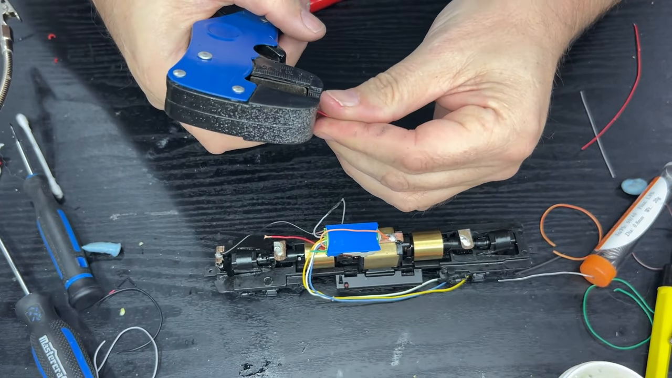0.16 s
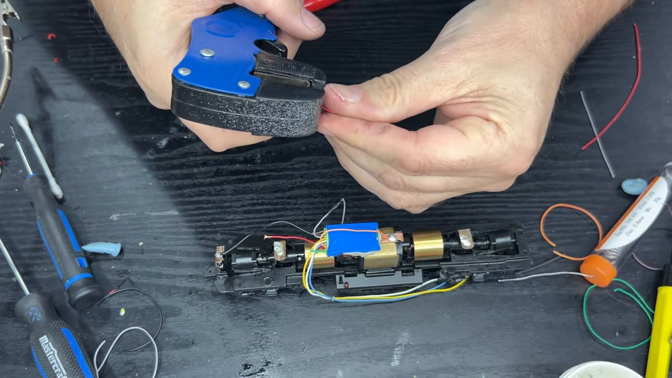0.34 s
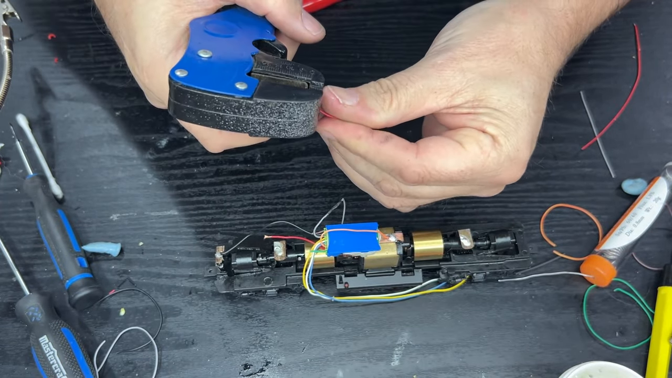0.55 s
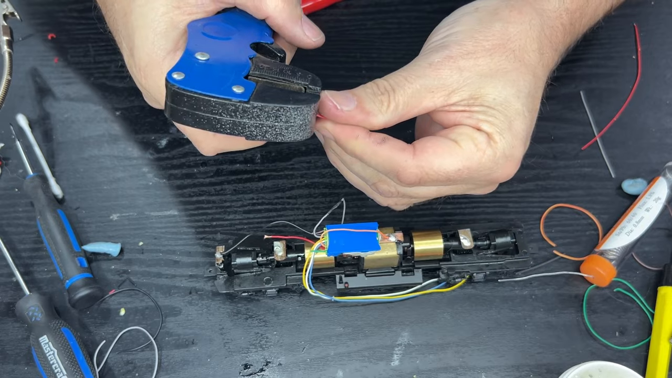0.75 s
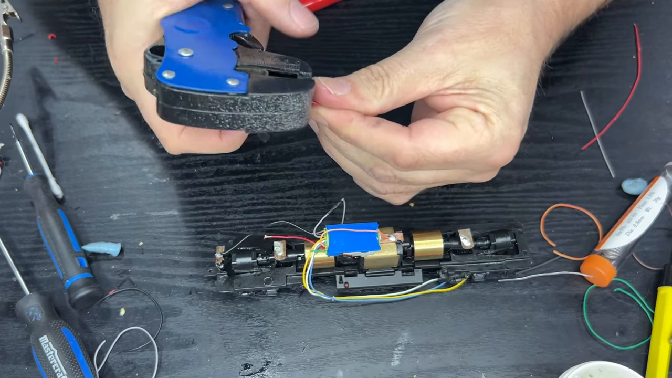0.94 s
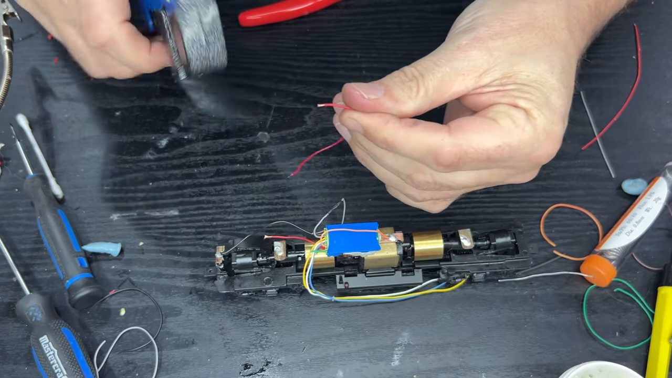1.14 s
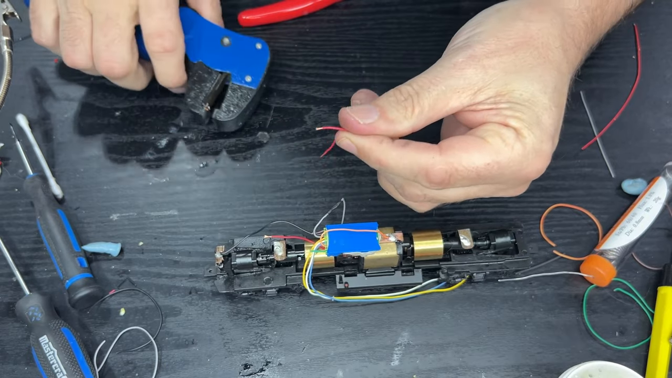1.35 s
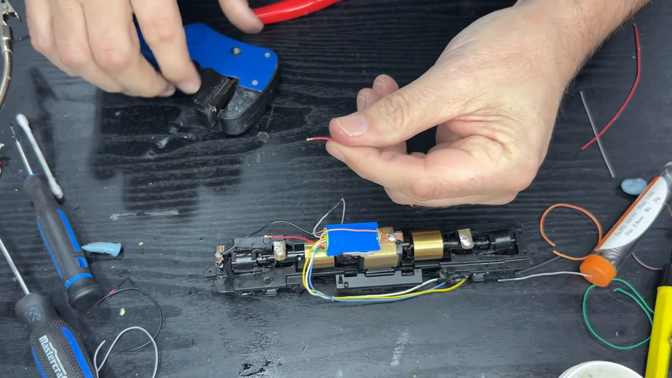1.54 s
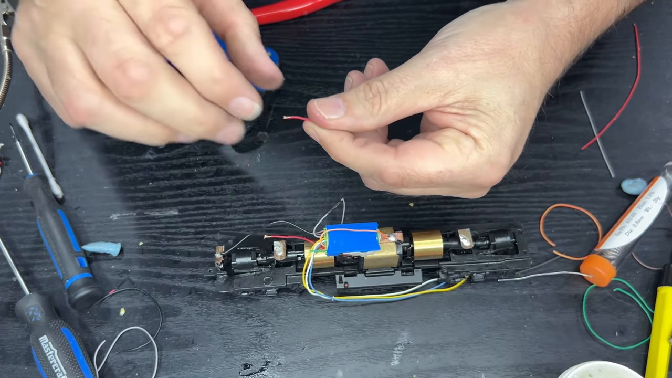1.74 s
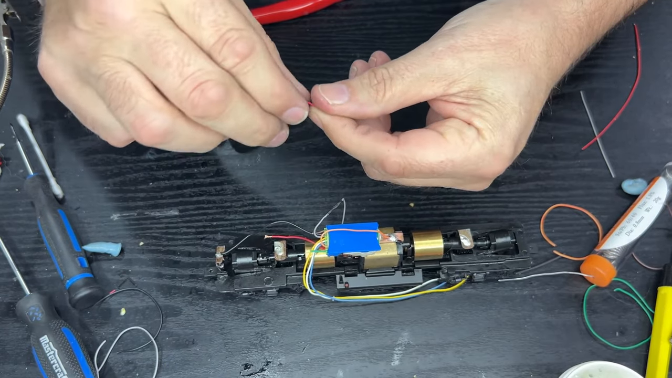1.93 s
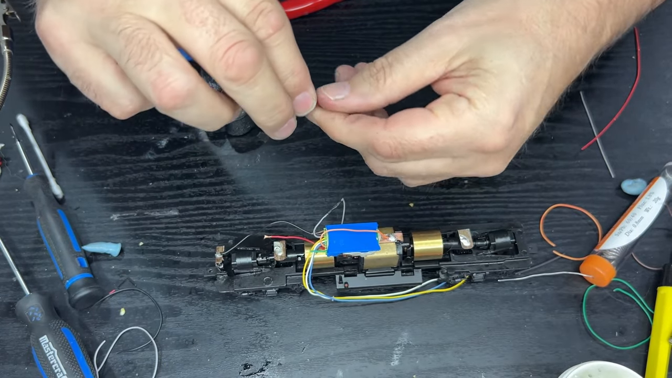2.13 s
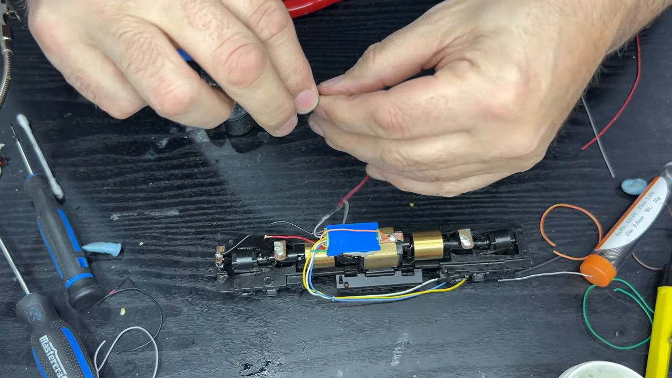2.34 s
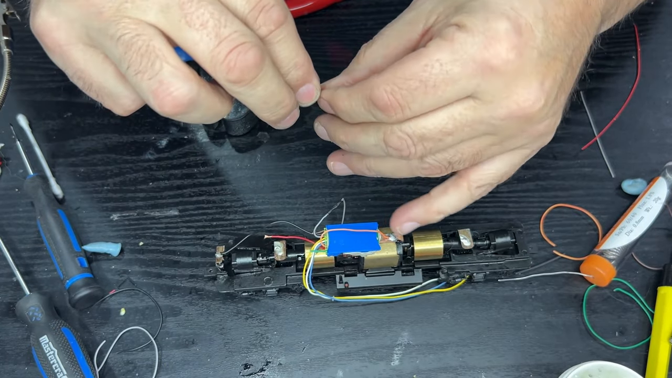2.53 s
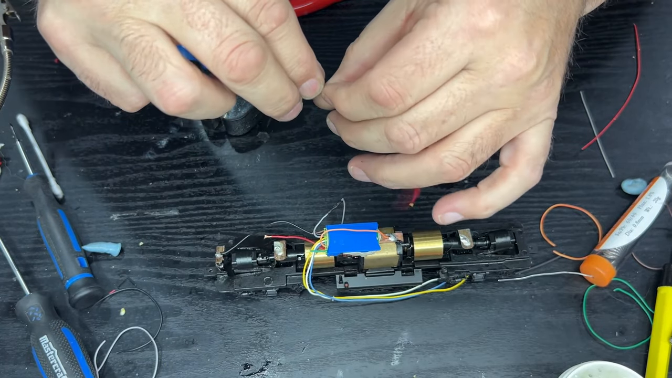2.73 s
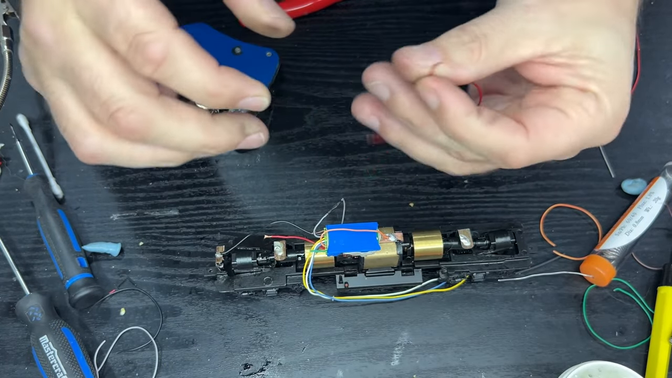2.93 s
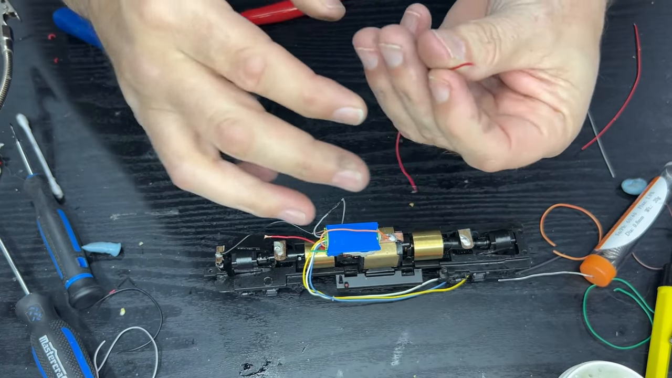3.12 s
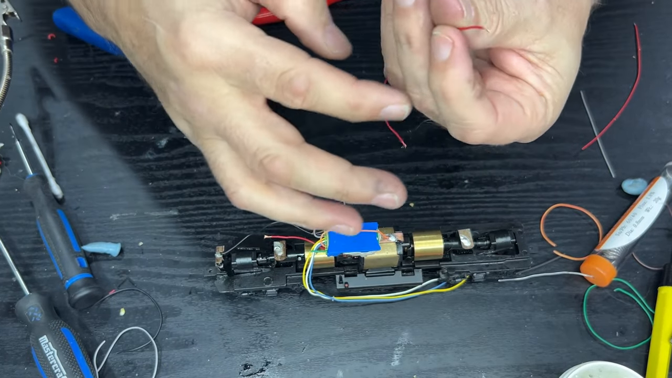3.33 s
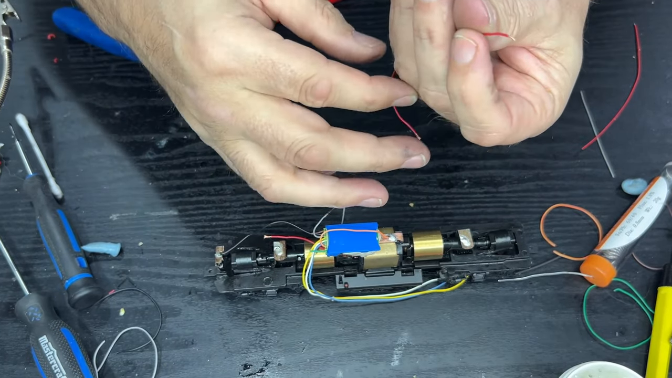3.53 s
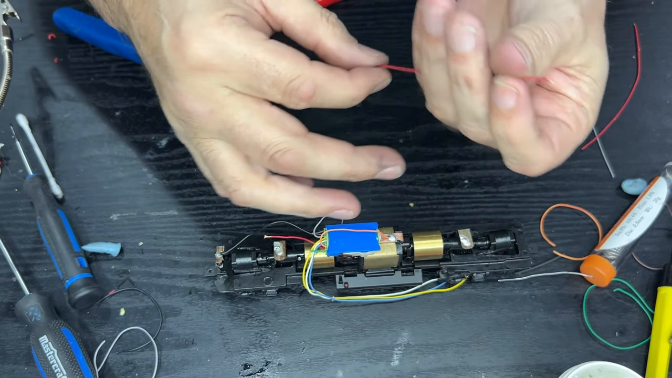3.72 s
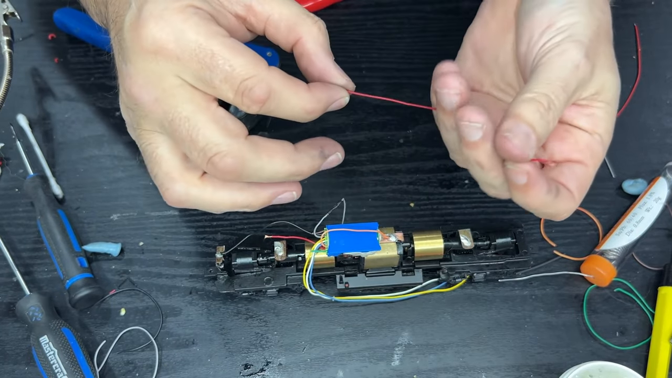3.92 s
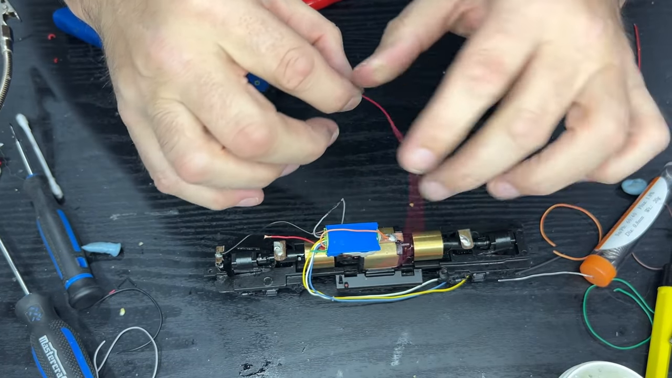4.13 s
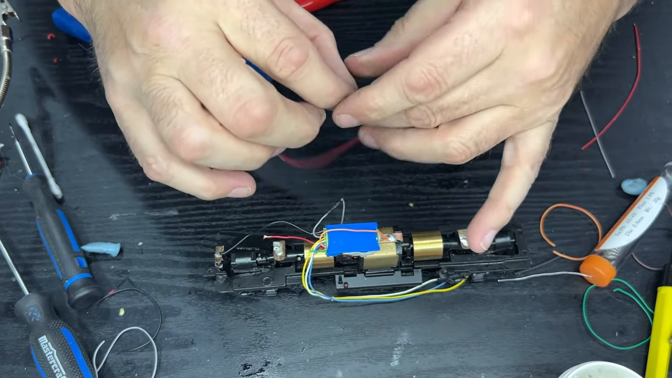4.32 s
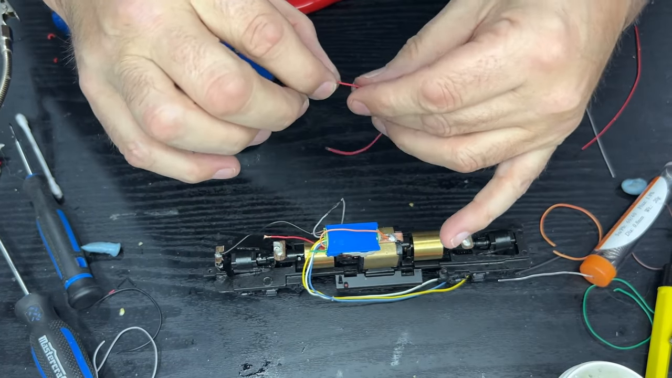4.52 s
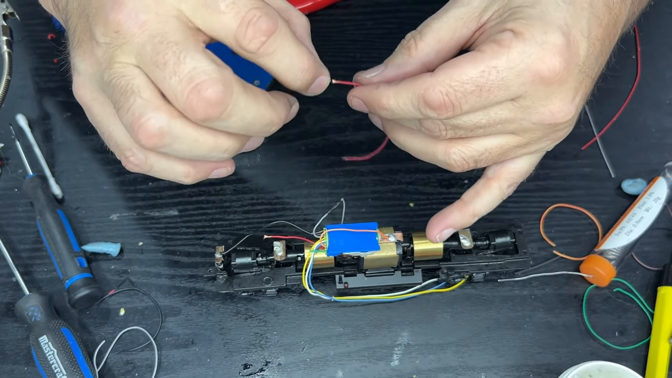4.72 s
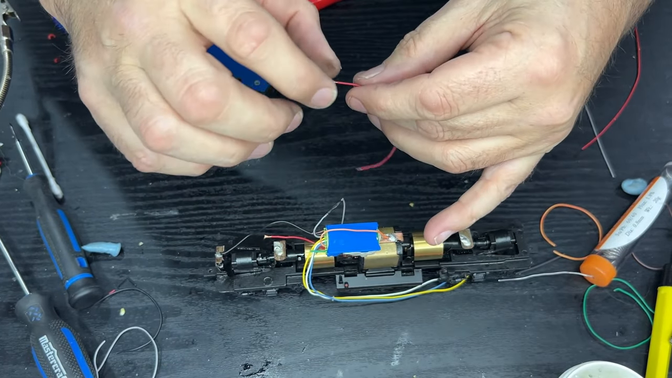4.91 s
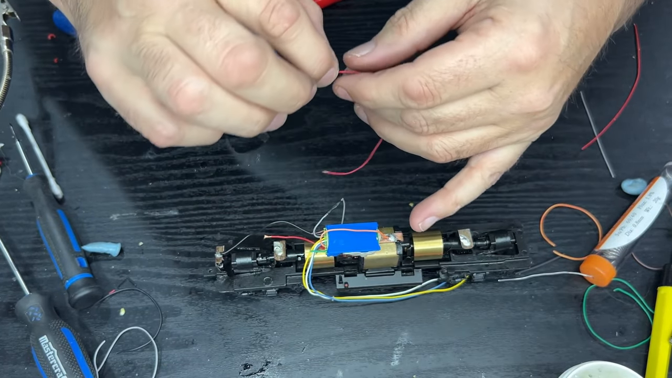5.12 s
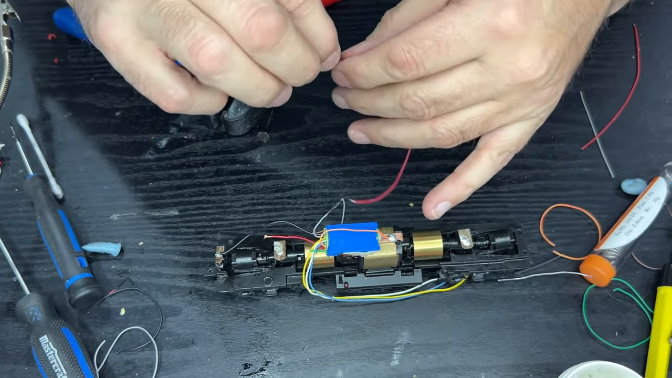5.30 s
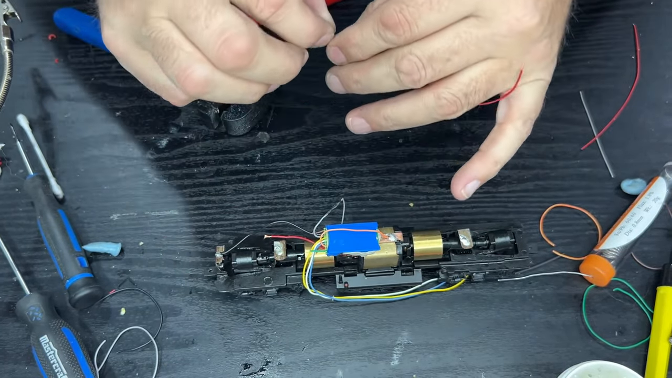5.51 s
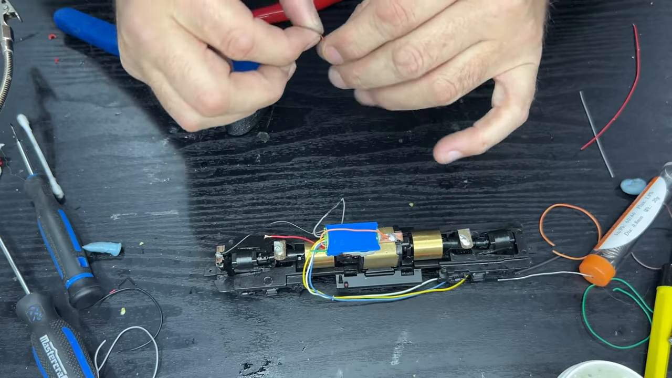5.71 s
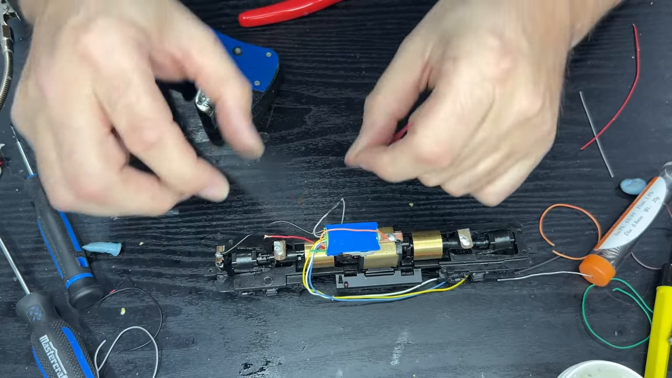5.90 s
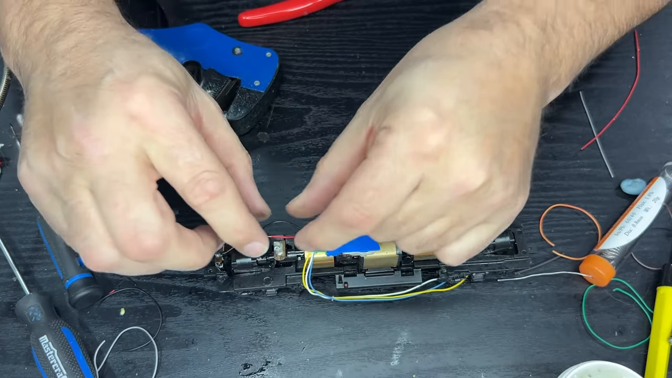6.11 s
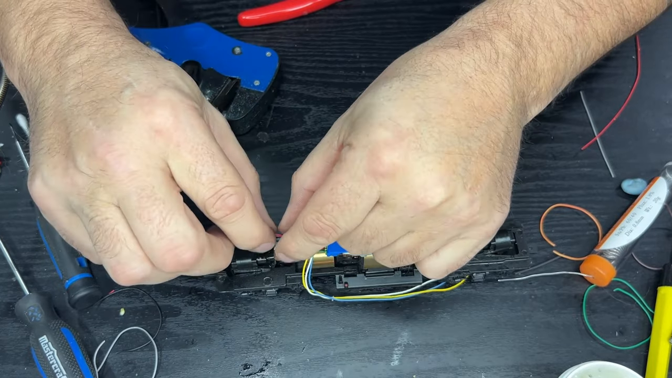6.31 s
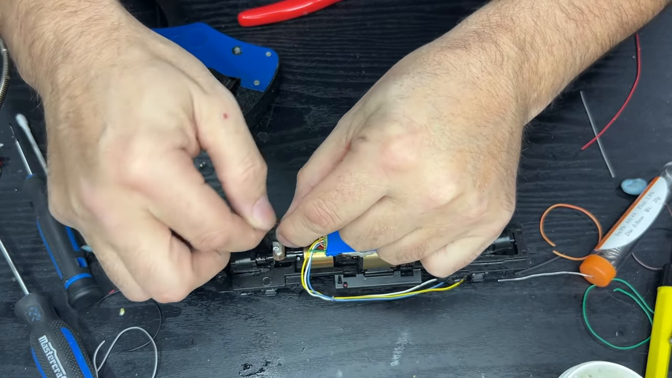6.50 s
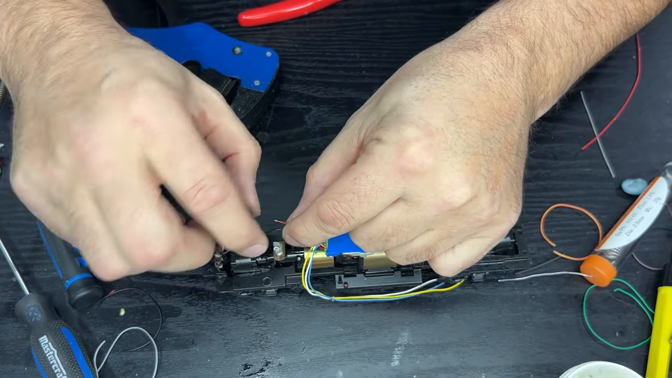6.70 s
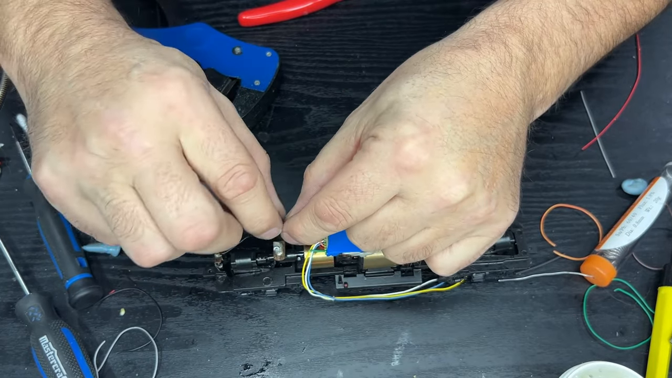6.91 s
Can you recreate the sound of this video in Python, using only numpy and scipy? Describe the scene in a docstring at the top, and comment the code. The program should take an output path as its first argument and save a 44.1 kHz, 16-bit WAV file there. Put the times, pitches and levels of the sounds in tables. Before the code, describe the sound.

A hand wire stripper is squeezed with a quick ratchety snap, then clacks and thuds onto a wooden bench before faint fingertip handling of thin wire.

```python
"""Skin slides and the room's rumble swells, then a wire stripper is squeezed and its steel jaws snap and ring.
The tool lands nose first, then with its whole body, and rocks to rest: its shell clacks, the top thuds.
Fingers then twist the wire in bright ticks, between soft grainy rubs of hands and low swells.
Blows are decaying noise bursts, resonances damped sines, rubs modulated noise; a small room answers,
over a low rumble and a very faint hiss."""
import sys
import numpy as np
from scipy import signal
from scipy.fft import rfft, irfft, next_fast_len
from scipy.io import wavfile
from scipy.ndimage import uniform_filter1d, map_coordinates

SR = 44100
rng = np.random.default_rng(int(sys.argv[2]) if len(sys.argv) > 2 else 0)


def log_audio(samples):
    """Write samples as a 16-bit WAV file to the path given in sys.argv[1]."""
    # one column per channel
    frames = np.atleast_2d(samples).T
    # limit to full scale, then quantise
    limited = np.clip(frames, -1, 1)
    pcm = np.round(limited * 32767).astype(np.int16)
    wavfile.write(sys.argv[1], SR, pcm)


N = 306495

# Event levels stand before the gains in scene(); treble tilts act above 1500 Hz.
# snaps of the mechanism: start_s, level_db, slip_decay_s, tilt_db_per_octave
JAW_SNAPS = [(.6745, -44.5, 0.00093, -12), (.827, -23.5, 0.0024, 4.5), (.847, -25, 0.0033, -0.5),
             (.863, -23, 0.0032, 1), (.879, -30.5, 0.0044, -4.5), (0.965, -13, .007, 0),
             (1.0503, -10, 0.0018, 2.5)]
# spectrum of a snap: frequency_hz, level_db
JAW_SPECTRUM = [(150, -31), (400, -23), (650, -15), (1200, -13.5), (1500, -11.5), (2000, -1.5), (2800, 0),
                (3700, -8), (5200, -18), (6400, -8.5), (7700, -8), (10000, -18), (16000, -18.5)]
# resonances of the steel jaws: frequency_hz, level_db, t60_s
STEEL_MODES = [(1922, -6, .05), (2313, -4, .05), (2662, 4, .07), (2790, 1, .06), (3306, -5, .06),
               (3865, -12, .06), (6438, -10, .05), (7600, -7, .04)]
# the tool landing and rocking: start_s, shell_clack_db, weight_thud_db, tilt_db_per_octave
TOOL_LANDINGS = [(1.3921, -21, -23.5, -6), (1.4873, -7.5, -12.5, .5), (1.5004, -17, -10, -3),
                 (1.517, -23.5, -26, 0.5), (1.536, -21, -14, -2), (1.56, -26.5, -16.5, -2),
                 (1.586, -31.5, -23, -3)]
# spectrum of the plastic shell: frequency_hz, level_db
SHELL_SPECTRUM = [(100, -23), (400, -7), (800, -4), (1200, 1), (2200, 1.5), (3500, -5), (5500, -8),
                  (8000, -4.5), (10500, -18), (16000, -28)]
# resonances of the wooden top: frequency_hz, level_db, t60_s
WOOD_MODES = [(159, -2, .3), (212, -5, .22), (282, 3, .35), (320, -1, .25), (345, 0, .24), (376, -4, .27),
              (433, -4, .3), (478, -4, .25), (532, -3, .3), (643, -5, .2), (773, -12, .25),
              (1168, -17, .25), (1616, -12, .23), (2341, -14, .25)]
# spectrum of a thud on the top: frequency_hz, level_db
THUD_SPECTRUM = [(25, -28.5), (50, -10), (100, -6), (150, 0), (290, 1.5), (400, 0), (540, -5), (800, -14.5),
                 (1500, -25), (4000, -48)]
# ticks of wire and fingernails: start_s, level_db, tilt_db_per_octave
WIRE_TICKS = [(.465, -64, -2), (1.301, -43, 17.5), (2.3452, -43.5, 4.5), (2.3842, -57, 10),
              (2.5636, -35.5, 3), (3.2004, -47.5, 18), (3.4004, -65.5, -9.5)]
# spectrum of a tick: frequency_hz, level_db
WIRE_SPECTRUM = [(500, -28), (2200, -17.5), (3500, -3.5), (5200, -12.5), (8000, 2), (11000, -2),
                 (16000, -11.5)]
# soft brushes and bumps of the hands: start_s, level_db, length_s, upper_edge_hz
HAND_BRUSHES = [(1.12, -47.5, .05, 1030), (1.185, -46, 0.047, 920), (1.22, -54, 0.093, 1050),
                (1.31, -59, 0.065, 700), (1.96, -60, 0.1, 1700), (2.53, -58.5, 0.2, 3630),
                (3.08, -52, 0.029, 1397), (3.96, -59, 0.054, 1900), (4.28, -58, 0.041, 1996),
                (4.98, -65.5, 0.035, 1600), (5.57, -60, 0.055, 3700), (5.725, -56.5, 0.042, 3900),
                (5.985, -63.5, 0.062, 1897), (6.754, -61, 0.025, 1000)]
# spectrum of a brush: frequency_hz, level_db
BRUSH_SPECTRUM = [(60, -11.5), (170, 4), (280, 1), (400, -1), (580, -7), (770, 1.5), (900, -9), (1080, -8),
                  (1450, -17), (1850, -10.5), (2400, -18.5), (3500, -14), (8000, -86)]
# skin sliding along insulation and grips: start_s, level_db, length_s
SKIN_SLIDES = [(0, -76, 0.16), (2.06, -67, 0.038), (3.727, -63, 0.054), (5.723, -60, 0.056),
               (6.376, -80, 0.072), (6.477, -54.5, 0.033), (6.659, -75.5, 0.048)]
# spectrum of a slide: frequency_hz, level_db
SLIDE_SPECTRUM = [(300, -19), (1500, -10), (2900, -7), (4800, -15.5), (7300, -2), (10000, -8.5),
                  (16000, 20.5)]
# low swells of the room's rumble: start_s, level_db, length_s
LOW_SWELLS = [(0, -63, .14), (.42, -62, .09), (2.561, -55, .19), (4.27, -63, .53), (5.55, -64, .27)]
# spectrum of a low swell: frequency_hz, level_db
SWELL_SPECTRUM = [(60, -9.5), (150, -7.5), (230, -5), (330, -13), (600, -9)]
# phase between the microphone ports: frequency_hz, left_lead_rad
PORT_LEAD = [(600, 0), (3700, .1), (4500, -1), (6000, -.4), (7800, -.8), (10000, -1.35), (13000, -2.5),
             (16000, -2.65)]
# sound thrown sideways by hands and bench: frequency_hz, level_db
SIDE_SCATTER = [(150, -36.5), (350, -21), (700, -10.5), (1500, -15), (3000, -10), (8000, -9.5)]
# decay of the room: frequency_hz, t60_s
ROOM_DECAY = [(60, .45), (250, 0.16), (1000, 0.37), (4000, .42), (9000, 0.35), (15000, 0.35)]
# colour of the room's answer: frequency_hz, level_db
WALL_SPECTRUM = [(200, -0.5), (600, 1), (1300, 0.5), (2800, -1.5), (4500, 5), (7500, -2.5), (12000, -1.5),
                 (13500, -15)]
# stereo width of the room's answer: frequency_hz, side_over_mid_db
ROOM_WIDTH = [(80, -29.5), (180, -21), (350, -11), (700, -2.5), (1400, -3), (3000, -3), (6000, -4.5),
              (10000, -0.5), (13000, 11.5)]
# spectrum of the room noise: frequency_hz, level_db
AIR_SPECTRUM = [(12, -50.5), (20, -22), (38, -10), (65, 1.5), (123, -7), (154, -11), (248, -21.5),
                (301, -24), (678, -36), (1610, -42), (1860, -37.5), (3740, -44), (11800, -49.5),
                (13500, -54), (16000, -52)]
# stereo width of the room noise: frequency_hz, side_over_mid_db
AIR_WIDTH = [(60, -22.5), (170, -6.5), (350, -1), (700, 7.5), (1400, 1.5), (3000, -2.5), (6000, -6),
             (10000, -0.5), (13500, 13.5)]

LOADED_DB = -35  # weaker snaps are mere play in the hinge and have no creep
STRAIN_LEAD_S, STRAIN_SLIP_S = .007, .006  # the loaded jaws creep this long before a snap; decay of the creep
STRAIN_UNDER_DB, STRAIN_MAX_DB = 12, -34.5  # creep is weaker than its snap, and never louder than this
JAW_RING_DB = -8  # steel ring relative to the crack
CONTACT_S, CONTACT_GROWS = .0035, 0.16  # contact decay; s added per s of rocking, as blows turn into scuffs
THUD_LAG_S, PUSH_S = 0.0022, .003  # the weight follows the shell; decay of its push
NOSE_HZ, NOSE_T60_S, NOSE_DB = 301, 0.16, -18  # the tool's hollow note
TICK_S = .0018  # contact decay of a wire tick
FIRM_DB, FIRM_EDGE_HZ, DB_PER_OCTAVE = -56, 15100, 19.5  # brightest slide; a lighter one loses an octave per this
SWELL_EDGE_HZ = 340
PRESSURE_DB, PRESSURE_PER_S = 2.2, 45  # spread of the wavering level, and new values per second
RISE_MAX_S, SWEEP_S = .035, 0.069  # strokes of SWEEP_S or longer rise this slowly; shorter ones start faster
TOP_HZ = 16200


def amp(db):
    """Level law: decibels to amplitude gain."""
    return 10 ** (np.asarray(db) / 20)


def unit(x):
    """Normalisation of mean power: scale to rms 1."""
    return x / np.sqrt(np.mean(x ** 2) + 1e-20)


def along(points, hz):
    """Logarithmic pitch scale: read (Hz, value) points on a log frequency axis."""
    point_hz, values = np.transpose(points)
    return np.interp(np.log(hz + 1), np.log(point_hz), values)


def filtered(x, response):
    """Linear filtering: multiply the spectrum of x by a complex response of frequency."""
    n = x.shape[-1]
    m = next_fast_len(n + 8192)
    return irfft(rfft(x, m) * response(np.fft.rfftfreq(m, 1 / SR)), m)[..., :n]


def add(track, s, x):
    """Superposition: mix x into the track at s seconds."""
    i = max(round(s * SR), 0)
    track[i:i + len(x)] += x[:N - i]


def knock(colour, tilt_db, size=4096):
    """Minimum phase: a causal impulse of energy 1 built from its spectrum alone."""
    hz = np.fft.rfftfreq(size, 1 / SR)
    tilt = tilt_db * np.log2(np.maximum(hz, 1500) / 1500)
    cepstrum = irfft(np.log(amp(along(colour, hz) + tilt)))
    # folding the cepstrum onto positive time makes the impulse causal
    folded = 2 * cepstrum[:size // 2] * (np.arange(size // 2) > 0)
    impulse = irfft(np.exp(rfft(folded, size)))
    return impulse / np.linalg.norm(impulse)


def ring(modes):
    """Modal vibration: damped sines of total energy 1, at new strengths for each blow."""
    t = np.arange(SR // 3) / SR
    x = np.zeros(len(t))
    for hz, db, t60 in modes:
        decay = amp(db + rng.normal(0, 1.5) - 60 * t / t60)
        x += decay * np.sin(2 * np.pi * (hz * t + rng.random()))
    x = x * (1 - np.exp(-t / 0.00044))
    return x / np.linalg.norm(x)


def contact(colour, length, tilt_db):
    """Micro-slip: a dying burst of noise excites a body's colour, with energy 1."""
    t = np.arange(SR // 3) / SR
    slips = rng.standard_normal(len(t)) * np.exp(-t / length) * (1 - np.exp(-t / .0005))
    x = signal.fftconvolve(slips, knock(colour, tilt_db))[:len(t)]
    return x / np.linalg.norm(x)


def strike(db):
    """Energy and duration: the gain giving a blow of energy 1 this rms level over three milliseconds."""
    return amp(db) * np.sqrt(.003 * SR)


def clicks(rows, colour, modes=None, ring_db=0):
    """Impact excitation: hard contacts, optionally ringing, as direct sound and as sound sent to the room."""
    direct, around = np.zeros(N), np.zeros(N)
    for s, db, length, tilt_db in rows:
        ringing = amp(ring_db) * ring(modes) if modes else 0
        add(direct, s, strike(db) * (contact(colour, length, tilt_db) + ringing))
        add(around, s + length, strike(db) * knock(colour, tilt_db))
        if modes:
            add(around, s, strike(db) * ringing)
    return direct, around


def jaws():
    """Stored strain let go: each loaded snap follows a fainter creep, and both ring the steel."""
    creeps = []
    for s, db, _, tilt_db in JAW_SNAPS:
        if db > LOADED_DB:
            creep_db = min(db - STRAIN_UNDER_DB, STRAIN_MAX_DB)
            creeps.append((s - STRAIN_LEAD_S, creep_db, STRAIN_SLIP_S, tilt_db))
    return clicks(list(JAW_SNAPS) + creeps, JAW_SPECTRUM, STEEL_MODES, ring_db=JAW_RING_DB)


def shell():
    """Impact turning to friction: after the loudest clack the shell's contacts grow ever longer."""
    hardest_s = max(TOOL_LANDINGS, key=lambda row: row[1])[0]
    clacks = []
    for s, db, _, tilt_db in TOOL_LANDINGS:
        length = CONTACT_S + CONTACT_GROWS * max(s - hardest_s, 0)
        clacks.append((s, db, length, tilt_db))
    return clicks(clacks, SHELL_SPECTRUM)


def bench(ring_db):
    """Plate excitation: each landing thumps the top and rings its modes; only thumps are sent to the room."""
    direct, around = np.zeros(N), np.zeros(N)
    for s, _, db, _ in TOOL_LANDINGS:
        thud = contact(THUD_SPECTRUM, PUSH_S, 0) + amp(ring_db) * ring(WOOD_MODES)
        add(direct, s + THUD_LAG_S, strike(db) * thud)
        add(around, s + THUD_LAG_S + PUSH_S, strike(db) * knock(THUD_SPECTRUM, 0))
    # the first landing, on the nose, alone sounds the hollow note
    nose = ring([(NOSE_HZ, 0, NOSE_T60_S)])
    add(direct, TOOL_LANDINGS[0][0] + THUD_LAG_S, strike(NOSE_DB) * nose)
    return direct, around


def wire():
    """Brief contact, broad spectrum: short ticks of the wire between the fingers."""
    return clicks([(s, db, TICK_S, tilt_db) for s, db, tilt_db in WIRE_TICKS], WIRE_SPECTRUM)


def rubs(rows, colour, grain_db, release):
    """Amplitude modulation: noise below an upper edge swells, holds and dies as its level wavers."""
    track, t = np.zeros(N), np.arange(SR // 2) / SR
    for s, db, length, edge_hz in rows:
        rise = RISE_MAX_S * min(length / SWEEP_S, 1) ** 2
        slow_noise = uniform_filter1d(rng.standard_normal(len(t)), size=120)
        grain = amp(grain_db * unit(slow_noise))
        x = filtered(grain * rng.standard_normal(len(t)),
                     lambda hz: amp(along(colour, hz)) / np.sqrt(1 + (hz / edge_hz) ** 14))
        stroke = np.minimum(t / rise, 1) * np.exp(-np.maximum(t - length, 0) / release)
        pressure = map_coordinates(rng.standard_normal(len(t)), [t * PRESSURE_PER_S], order=1)
        add(track, s, amp(db + PRESSURE_DB * pressure) * unit(x) * stroke)
    return track


def soft_sounds():
    """Dry friction as grainy noise: palms brush, fingers slide (duller when lighter); the room's rumble swells."""
    brushes = rubs(HAND_BRUSHES, BRUSH_SPECTRUM, grain_db=2.5, release=0.008)
    strokes = []
    for s, db, length in SKIN_SLIDES:
        edge_hz = FIRM_EDGE_HZ * 2 ** min((db - FIRM_DB) / DB_PER_OCTAVE, 0)
        strokes.append((s, db, length, edge_hz))
    slides = rubs(strokes, SLIDE_SPECTRUM, grain_db=2.5, release=0.0042)
    swell_rows = [(*row, SWELL_EDGE_HZ) for row in LOW_SWELLS]
    swells = rubs(swell_rows, SWELL_SPECTRUM, grain_db=0, release=0.046)
    return brushes + slides + swells


def at_ports(x):
    """Phase difference: direct sound at two ports, with a little scattered sideways by hands and bench."""
    opposite = np.array([[1], [-1]])
    direct = filtered(x, lambda hz: np.exp(.5j * along(PORT_LEAD, hz) * opposite))
    t = np.arange(SR // 50) / SR
    scatter = rng.standard_normal(len(t)) * np.exp(-t / 0.0043)
    scattered = signal.oaconvolve(x, scatter / np.linalg.norm(scatter))[:N]
    side = filtered(scattered, lambda hz: amp(along(SIDE_SCATTER, hz)))
    return direct + np.array([side, -side])


def diffuse(pair, width):
    """Diffuse field: two unrelated signals become mid and side, shared out by frequency."""
    def shares(hz):
        """Power conservation: mid and side gains with squares summing to 1."""
        side = amp(along(width, hz))
        return np.array([np.ones_like(side), side]) / np.sqrt(1 + side ** 2)
    mid, side = filtered(pair, shares)
    return np.array([mid + side, mid - side])


def reverb(x):
    """Exponential decay: the small room's noise tail dies at each frequency's own speed."""
    hz, t, z = signal.stft(rng.standard_normal((2, SR * 3 // 5)), SR, nperseg=256)
    decay_db = along(WALL_SPECTRUM, hz)[:, None] - 60 * t / along(ROOM_DECAY, hz)[:, None]
    _, pair = signal.istft(z * amp(decay_db), SR, nperseg=256)
    tail = diffuse(pair, ROOM_WIDTH)
    tail_s = np.arange(tail.shape[1]) / SR
    tail = tail * (1 - np.exp(-(tail_s / 0.0025) ** 2))  # the walls take a moment to answer
    return signal.oaconvolve(x[None], tail / np.linalg.norm(tail[0]), axes=1)[:, :N]


def room_noise(level_db):
    """Stationary noise: a low rumble under a very faint hiss, as shaped mid and side."""
    mid, side = filtered(rng.standard_normal((2, N)), lambda hz: amp(along(AIR_SPECTRUM, hz)))
    side = filtered(side, lambda hz: amp(along(AIR_WIDTH, hz)))
    return amp(level_db) * unit(np.array([mid + side, mid - side]))


def scene():
    """Superposition of direct sound, room answer and noise: squeeze, put down, twist the wire."""
    snaps, snaps_around = jaws()
    clacks, clacks_around = shell()
    thump, thump_around = bench(ring_db=0.0)
    ticks, ticks_around = wire()
    soft = soft_sounds()
    direct = at_ports(snaps + clacks + thump + ticks + amp(-2) * soft)
    # things held near the microphone sound dry; the bench top radiates into the whole room
    held = amp(-12.5) * snaps_around + amp(-11.5) * ticks_around
    roomy = amp(-5.5) * clacks_around + amp(-4) * thump_around + amp(-2.5) * soft
    return direct + reverb(held) + reverb(roomy) + room_noise(level_db=-59.5)


def record(dry):
    """Saturation, then band limiting: clip at full scale and cut steeply above TOP_HZ."""
    return filtered(np.clip(dry, -1, 1), lambda hz: 1 / np.sqrt(1 + (hz / TOP_HZ) ** 200))


dry = scene()
out = record(dry)
log_audio(out)
```